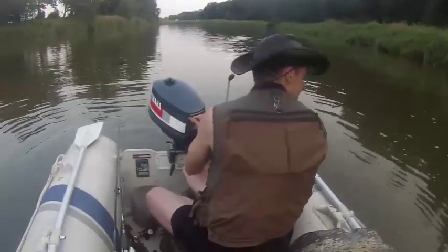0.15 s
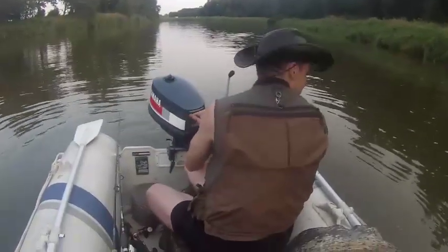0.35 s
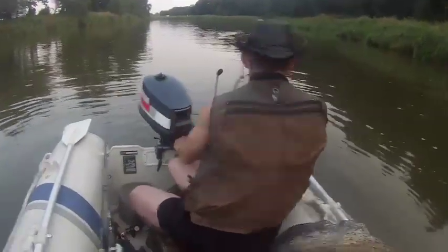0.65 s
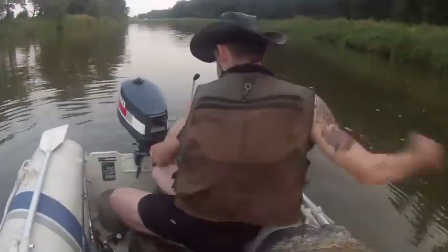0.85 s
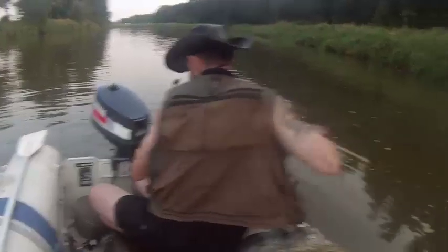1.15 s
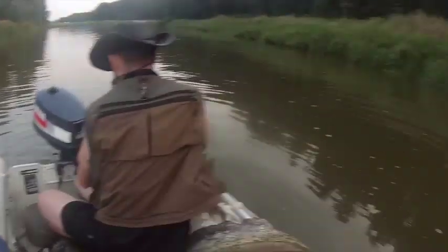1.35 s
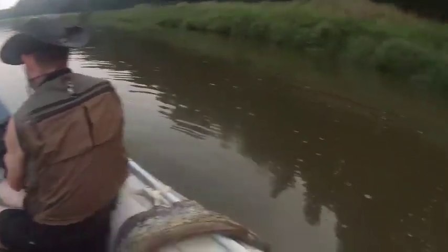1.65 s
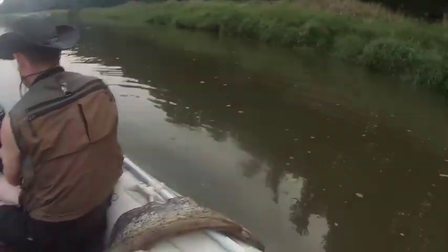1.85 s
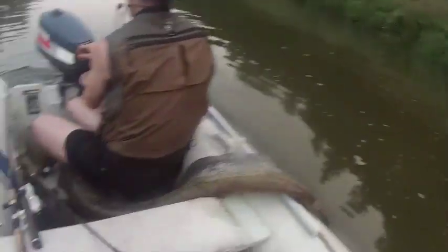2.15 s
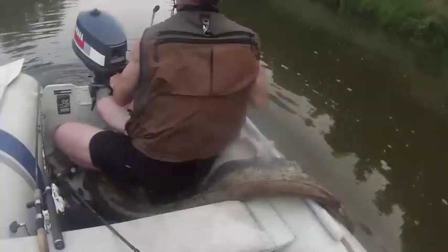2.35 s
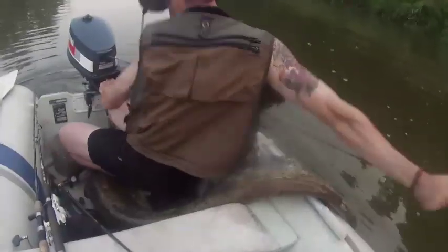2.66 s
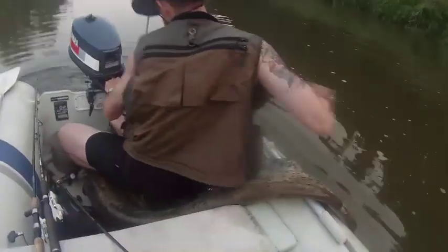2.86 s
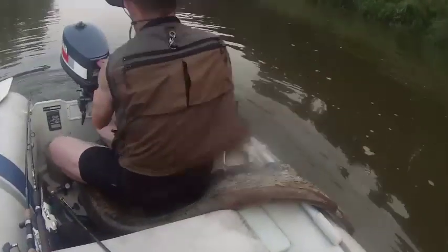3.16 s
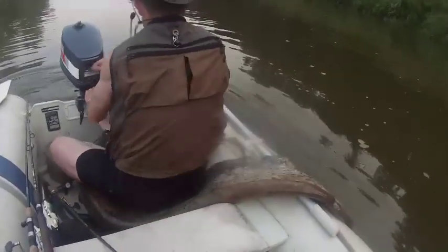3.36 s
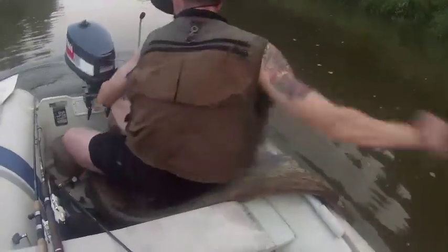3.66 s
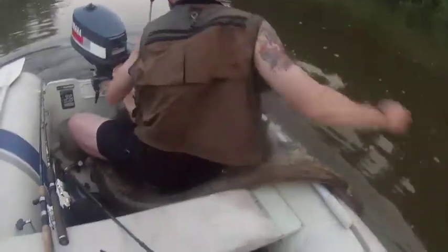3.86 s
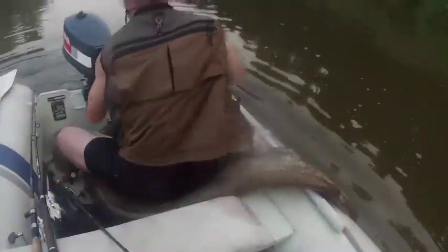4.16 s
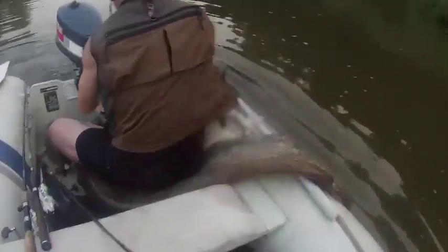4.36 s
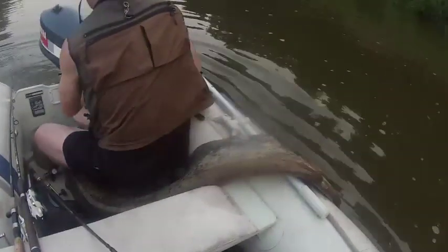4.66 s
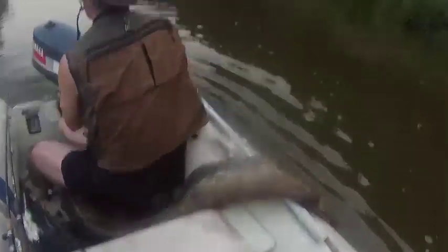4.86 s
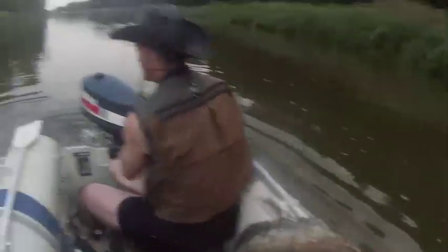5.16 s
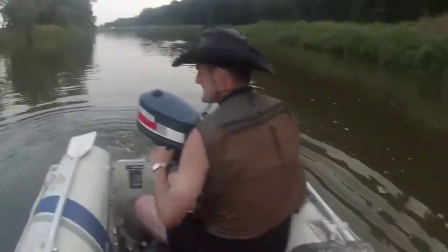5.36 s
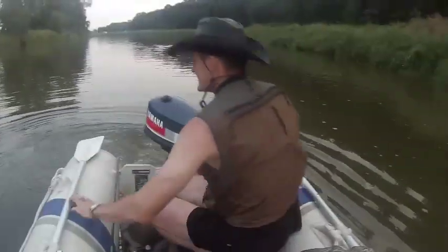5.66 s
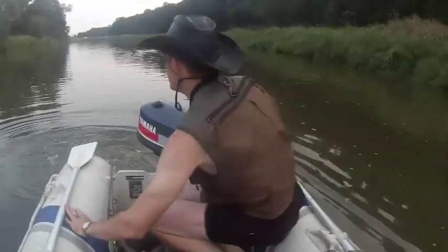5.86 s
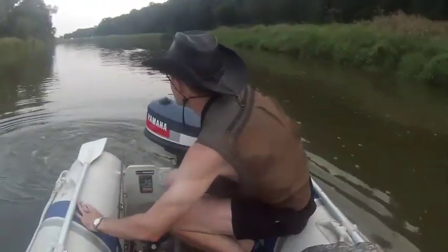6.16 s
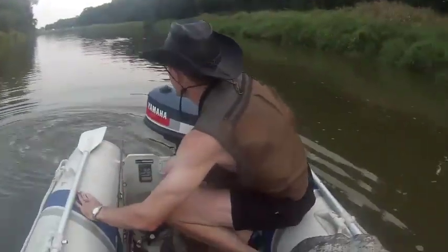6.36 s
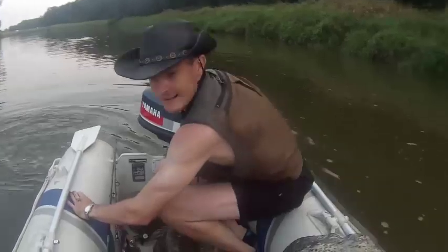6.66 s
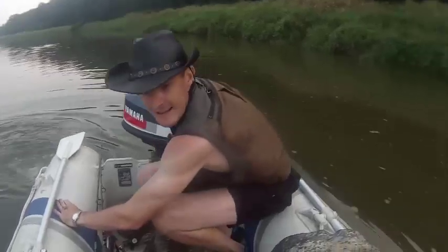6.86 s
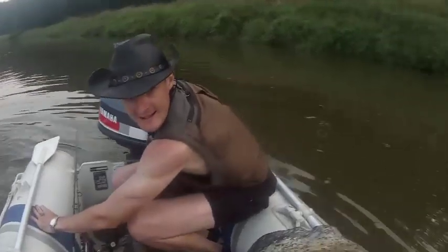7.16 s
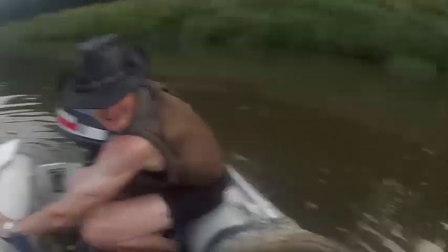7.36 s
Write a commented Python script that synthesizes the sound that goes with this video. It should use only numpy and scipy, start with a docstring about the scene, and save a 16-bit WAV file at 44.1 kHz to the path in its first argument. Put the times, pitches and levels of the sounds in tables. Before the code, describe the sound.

Heard from inside a hard plastic case, a small outboard motor is pull-started with a hollow clack and faint squeaks of cord. Handling of the case takes over for about two seconds: heavy thumps, ringing knocks and rough scrapes, much louder than anything else. Then the engine is left puttering quietly, a dulled, throbbing idle with clattering, ticking parts that quickens slightly over a light hiss.

```python
"""A hollow clack and thin cord squeaks, then loud thumps, knocks and scrapes, then a faint putter.
A small outboard on an inflatable boat is pull-started and idles, heard from inside a hard case.
Hands shift the case: its wall swings and rings, and the hardest blows make a limiter duck.
The engine fires once a turn, ringing its exhaust leg while parts clatter and tick."""
import sys
import numpy as np
from scipy import signal
from scipy.fft import rfft, irfft
from scipy.io import wavfile
from scipy.ndimage import uniform_filter1d

SR = 44100
rng = np.random.default_rng(int(sys.argv[2]) if len(sys.argv) > 2 else 0)


def pcm_store(signal):
    """Save signal as 16-bit PCM."""
    levels = np.round(np.clip(np.atleast_2d(signal), -1, 1) * 32767)
    wavfile.write(sys.argv[1], SR, levels.astype(np.int16).T)


N = 330750


def gain_of(db):
    return 10 ** (np.asarray(db) / 20)


def unit_rms(x):
    return x / np.sqrt(np.mean(x ** 2) + 1e-20)


def smooth_noise(samples):
    return unit_rms(uniform_filter1d(rng.standard_normal(N), size=samples))


def butter(x, order, hz, kind="low"):
    return signal.lfilter(*signal.butter(order, hz, kind, fs=SR), x)


def spectrum(points):
    """(Hz, value) points at every FFT bin, on a log frequency axis."""
    hz, value = np.transpose(points)
    return np.interp(np.log(np.fft.rfftfreq(N, 1 / SR) + 1), np.log(hz + 1), value)


def curves(rows):
    """Each column after time, at every sample."""
    times, *columns = np.transpose(rows)
    return [np.interp(np.arange(N) / SR, times, column) for column in columns]


def gate(rows):
    """1 over the table's time span, 0 outside, soft edges."""
    t = np.arange(N) / SR
    return uniform_filter1d(1. * (t > rows[0][0]) * (t <= rows[-1][0]), size=800, mode="nearest")


def clicks(cycles):
    """One impulse per completed cycle."""
    return np.diff(np.floor(cycles), prepend=0)


def add(mix, start_s, sound):
    part = mix[round(start_s * SR):][:len(sound)]
    part += sound[:len(part)]


def resonate(x, hz, width_hz):
    """Unit-gain resonance; hz may glide."""
    carrier = np.exp(2j * np.pi * np.cumsum(hz * np.ones(len(x))) / SR)
    pole = np.exp(-np.pi * width_hz / SR)
    return 2 * (carrier * signal.lfilter([1 - pole], [1, -pole], x / carrier)).real


def resonate_twice(x, hz, width_hz):
    return resonate(resonate(x, hz, width_hz), hz, width_hz)


def body(x, modes):
    """Drives a set of modes; white noise roughly keeps its rms."""
    energy = sum(gain_of(db) ** 2 * width for _, width, db in modes) * 2 * np.pi / SR
    ring = sum((-1) ** k * gain_of(db) * resonate(x, hz, width) for k, (hz, width, db) in enumerate(modes))
    return ring / np.sqrt(energy)


def struck(modes):
    """Click response: a clean hollow ring with distinct pitches."""
    click = signal.unit_impulse(2000)
    ring = sum(gain_of(db) * resonate_twice(click, hz, 1.3 * width) for hz, width, db in modes)
    return ring / np.linalg.norm(ring)


def thumps():
    """A pushed wall swings, rebounds and settles; quicker pushes jolt its bass modes harder."""
    # pushes: (time [s], level [dB], pitch [Hz], direction [1 in, -1 out])
    pushes = [(0.843, -37, 41.8, -1), (2.217, -8.5, 49, 1), (2.227, -13, 47.6, -1), (2.274, -13, 29.8, -1),
              (2.308, -15, 48, -1), (2.376, -11.5, 98, -1), (2.385, -9, 50, -1), (2.395, -12.5, 40, 1),
              (2.475, -19, 94, 1), (2.487, -4.5, 75, -1), (2.491, -16, 45.4, 1), (2.509, -15.5, 38.5, -1),
              (2.585, -18, 47.3, 1), (2.608, -12, 26.3, 1), (2.619, -10, 70.6, 1), (2.625, -2, 56, -1),
              (2.774, -24, 25, 1), (2.877, -19.5, 57.5, 1), (2.908, -15, 29, 1), (2.965, -7, 76, -1),
              (3.088, -22, 28.1, -1), (3.14, -23.5, 48, -1), (3.297, -22.5, 36.6, -1),
              (3.365, -20.5, 30, -1), (3.513, -20.5, 25, -1), (3.581, -22, 26.7, -1),
              (3.674, -15.5, 24.7, -1), (3.731, -20, 107, 1), (3.781, -18, 31.8, 1),
              (3.809, -18.5, 44.7, 1), (3.82, -14, 25.6, -1), (3.891, -11.5, 81, -1),
              (3.926, -13, 26.8, -1), (3.958, -12, 47, 1), (4.004, -19, 33.4, -1), (4.139, -9, 67, 1),
              (4.148, -13, 34.4, -1), (4.172, -21, 39, 1), (4.226, -21, 35.3, 1), (4.248, -16.5, 104, 1),
              (4.32, -17, 43.6, 1), (4.341, -33, 40, -1), (4.357, -18, 27, 1), (4.749, -46, 254, 1),
              (6.676, -36, 53.3, 1)]
    swell_cycles, jolt_t60_s = .23, .022
    swings, jolts = np.zeros((2, N))
    t = np.arange(SR // 4) / SR
    for s, db, hz, direction in pushes:
        age = t * hz / swell_cycles
        swell = (age * np.exp(1 - age)) ** 1.14
        add(swings, s, direction * gain_of(db) * swell * np.sin(2 * np.pi * hz * t))
        octaves = min(np.log2(hz / 68), .6)
        add(jolts, s, gain_of(db - 19 + 18.5 * octaves - 60 * t / jolt_t60_s))
    return swings, jolts


def knocks():
    """A knock is a clean click and a dying burst: burst envelopes and clicks per case band."""
    # (time [s], level [dB], bass [dB], upper ring [dB], treble [dB], top [dB], t60 [s])
    hits = [(0.79, -36, 0, -19, -8, 3, 0.045), (0.941, -39, 7, 2, -3, 10, 0.098),
            (1.022, -42, 0, -12, -7, -4.5, 0.015), (1.333, -39, -13, -16, -18, -18, 0.12),
            (1.575, -39.5, 6, 1.5, -14, -14, 0.023), (1.654, -35.5, -9, -2, -10, -5, 0.027),
            (2.216, -6, -4.5, 0, 5, 3, 0.014), (2.219, -21, -21, 4, 7, 12, 0.064),
            (2.284, -36, -7, 9, 12, 14, .03), (2.309, -35, 3, -3, -8, -8, 0.018),
            (2.344, -33, 3, 1, 5, 4, .014), (2.377, -30, 2, -9, -7, -7, 0.025),
            (2.413, -51, 2, 1, -9, -12, 0.023), (2.438, -30, 2, 3, -17, -16, 0.0069),
            (2.477, -28, 17, 0, -2, -3, 0.0082), (2.487, -11.5, -9, 7, 0.5, -20, 0.017),
            (2.624, -31, 13, 3, 7, 13, 0.026), (2.63, -35, 14, 0, 2, 9, 0.012),
            (2.763, -38, 1, 11.5, -15, -11, 0.013), (2.788, -31.5, -13, 11, -2, 1, 0.024),
            (2.826, -49, -11, 19, -7, -9, 0.014), (2.855, -60, -5, 6, -5, -8, 0.014),
            (2.883, -37, 4, -11, 4, 2, 0.021), (2.955, -20.5, -9, 6, -10, 1, 0.059),
            (2.962, -25, -6, -0.5, 5.5, -2, 0.01), (3.417, -33.5, 0, -12, 5, 6, 0.045),
            (3.727, -16, 6, 2, -5, -11, 0.027), (3.8, -35.5, 12.5, 3, -13, -13, 0.028),
            (3.81, -28.5, 9, -5, 4, -5, 0.017), (3.888, -39, 7, 3, 6, -1, 0.044),
            (4.116, -35.5, 6, 0, -13, -11, .024), (4.142, -33, -5, -6, 2, 3, 0.0089),
            (4.232, -24.5, 9, -2, -23, -25, 0.0077), (4.249, -10.5, -1, 4.5, 7.5, -25, 0.0082),
            (4.319, -11.5, -2.5, -1, 6.5, -8.5, 0.02), (4.355, -25, 17.5, -7, -15, -20, 0.024),
            (5.127, -43.5, -13, 4, -9, -9, .012)]
    band_db, snap_db = [-8.5, -12, -15, -22, -28.5, -45], 17.5
    bursts, snaps = np.zeros((2, 6, N))
    t = np.arange(SR // 8) / SR
    for s, db, bass, upper, treble, top, t60 in hits:
        for band, colour_db in enumerate((0, bass, upper, treble, top, top)):
            level_db = db + band_db[band] + colour_db
            add(bursts[band], s, gain_of(level_db - 60 * t / t60))
            add(snaps[band], s, gain_of([level_db + snap_db]))
    return bursts, snaps


def scrapes(grain):
    """A finger or strap strokes the case: grit envelopes per band."""
    # (time [s], length [s], level [dB], bass [dB], upper ring [dB], treble [dB], top [dB])
    strokes = [(0.665, 0.016, -42.5, -11, -5.5, -4.5, 3), (0.929, 0.082, -55.5, -2, -11, -5, 1),
               (2.214, 0.033, -32, 1.5, -10, 2, 0), (2.271, 0.073, -47, 2, -1, 1, 5.5),
               (2.33, 0.046, -36, 7.5, -2, -1.5, -5), (2.342, 0.023, -46, 9, -9, -1, 2),
               (2.386, 0.053, -64, 17, -19, -22, -16), (2.445, 0.013, -48, 11, -18, -18, -18),
               (2.48, 0.016, -40, 26, -5, -2, 5), (2.562, 0.058, -51.5, 15, -2, 1, -2),
               (2.611, 0.025, -41.5, 12, 3, -1, 6), (2.737, 0.26, -64.5, 5.5, 8.5, 7, 11),
               (2.974, 0.057, -60.5, 4, 6, 7, 4), (3.41, 0.024, -43.5, 2, -12, -11, -10),
               (3.634, 0.02, -53.5, -17, 8, 11.5, 1), (3.67, 0.047, -49.5, -6, -11, -12, -12),
               (3.835, 0.049, -53, 7, -7, -7, -9), (4.113, 0.075, -59, 16, 0, -9, -13),
               (4.301, 0.036, -47, 1, -2, -9, 7), (4.326, 0.09, -35, 2, -6, -7, -6),
               (4.384, .025, -41.5, -2, -15, 2, -21), (4.438, 0.014, -37, 2, -7, -2, -14)]
    band_db = [2, -3, 3, -10.5, -11, -21]
    out = np.zeros((6, N))
    for s, length, db, bass, upper, treble, top in strokes:
        n = round(length * SR)
        stroke = signal.windows.tukey(n, .4) * grain[round(s * SR):][:n]
        for band, colour_db in enumerate((0, bass, upper, treble, top, top)):
            add(out[band], s, gain_of(db + band_db[band] + colour_db) * stroke)
    return out


def rubbing():
    """Fingers and cloth rub the case: clumpy grit envelopes per band."""
    # friction: (time [s], level [dB])
    rubs = [(.55, -63), (.8, -57.5), (.95, -55), (1.2, -58.5), (1.55, -55.5), (1.85, -65), (2.2, -61.5),
            (2.27, -50), (2.39, -51.5), (2.45, -43.5), (2.59, -52), (3.26, -55.5), (3.7, -50), (4.08, -52),
            (4.31, -48.5), (4.5, -55.5)]
    band_db = [-1.5, -7, -2, -17, -15.5, -28]
    clumps = gain_of(1.6 * smooth_noise(300))
    return gate(rubs) * clumps * gain_of(curves(rubs)[0]) * gain_of(band_db)[:, None]


def squeak():
    """Skin sticks and slips on plastic, quickening as it fades: impulses per case band."""
    start_s, length_s, rise_s = 4.335, .06, .018
    band_db = [1, 4, -18, -20, -26, -53]
    t = np.arange(0, length_s, 1 / SR)
    unsteady = 1 + .18 * uniform_filter1d(rng.standard_normal(SR // 8), size=150)[:len(t)]
    slip_hz = (225 + 1700 * t) * unsteady
    slips = unit_rms(clicks(np.cumsum(slip_hz) / SR))
    slips *= np.minimum(t / rise_s, 1) ** 2 * gain_of(-26 - 14 * t / length_s)
    out = np.zeros((6, N))
    for band, db in zip(out, band_db):
        add(band, start_s, gain_of(db) * slips)
    return out


def rasps(grain):
    """Where a stroke sticks, one patch of wall sings roughly."""
    # (time [s], length [s], start [Hz], end [Hz], width [Hz], level [dB])
    patches = [(2.272, 0.057, 1450, 1360, 200, -53), (2.325, 0.048, 4900, 5570, 400, -48),
               (2.338, 0.064, 2480, 2370, 250, -46), (2.406, 0.011, 1920, 2000, 200, -49),
               (3.84, 0.056, 2320, 2380, 200, -56), (4.14, 0.045, 1950, 1830, 200, -54),
               (4.329, 0.062, 1740, 2050, 220, -34), (4.362, .03, 1040, 1340, 200, -38),
               (4.374, 0.047, 2820, 3230, 350, -49.5), (4.388, .032, 1280, 1480, 200, -41)]
    out, grit = np.zeros(N), grain * rng.standard_normal(N)
    for s, length, start_hz, end_hz, width_hz, db in patches:
        n = round(length * SR)
        ring = resonate_twice(grit[round(s * SR):][:n], np.linspace(start_hz, end_hz, n), width_hz)
        add(out, s, gain_of(db) * signal.windows.tukey(n, .6) * unit_rms(ring))
    return out


def case(jolts):
    """Contacts drive one hollow shell in six bands: middle, bass, upper ring, treble, top, edge."""
    # wall modes: (pitch [Hz], width [Hz], level [dB])
    middle = [(1130, 410, 4), (1363, 290, 9), (1530, 164, 3)]
    bass = [(181, 93, 6.5), (269, 134, 5), (428, 193, -5.5), (712, 148, -7.5)]
    upper = [(1810, 250, 0), (2080, 283, 3.5), (2314, 304, 1.5)]
    treble = [(2600, 350, 6), (3724, 440, 16), (4570, 540, 9.5)]
    top = [(5260, 910, 1.5), (5760, 600, 6), (6320, 900, 0.5)]
    grain = gain_of(4 * smooth_noise(120))
    bursts, snaps = knocks()
    envelopes = bursts + scrapes(grain) + rubbing()
    envelopes[1] += jolts
    drive = envelopes * rng.standard_normal((6, N)) + squeak()
    hollow = butter(body(drive[0], middle) + body(drive[2], upper), 2, 850, "high")
    hollow = butter(hollow + body(drive[1], bass), 2, 4500)
    bright = butter(body(drive[3], treble) + body(drive[4], top), 3, 7000)
    bright = butter(bright, 2, 2400, "high")
    edge = butter(drive[5] + snaps[5], 2, [7000, 12000], "band")
    ringing = sum(signal.oaconvolve(snap, struck(modes))[:N]
                  for snap, modes in zip(snaps, (middle, bass, upper, treble, top)))
    return hollow + bright + edge + ringing + rasps(grain)


def exhaust(turns, fast, running, strength, noise):
    """Firings ring the exhaust leg; at low speed its note throbs deeper and glides up each turn."""
    # chugs, some beats missing: (time [s], level [dB])
    chugs = [(4.52, -78), (4.54, -66.5), (4.82, -55.5), (4.86, -49.5), (4.93, -63.5), (5.11, -54.5),
             (5.14, -70), (5.17, -50), (5.3, -69), (5.37, -53), (5.42, -58.5), (5.56, -53.5), (5.6, -64),
             (5.73, -48), (5.88, -62), (5.91, -50), (6.15, -55.5), (6.17, -45), (6.23, -64), (6.26, -51),
             (6.34, -73), (6.39, -54), (6.46, -50), (6.84, -50.5), (7.0, -56.5), (7.11, -50.5), (7.14, -63),
             (7.17, -56), (7.2, -71), (7.28, -48.5), (7.35, -64), (7.46, -70), (7.5, -42)]
    # leg resonance: (time [s], pitch [Hz])
    note = [(4.52, 200), (4.9, 195), (5.14, 218), (5.45, 189), (5.72, 198), (5.95, 186.7), (6.2, 173.7),
            (6.4, 158.4), (6.46, 159.4), (6.85, 159.6), (7.0, 165.4), (7.3, 167), (7.5, 162)]
    hz = curves(note)[0] + 39 * (1 - fast) * (turns % 1 - .5)
    firings = strength[turns.astype(int)] * clicks(turns)
    puffs = resonate(resonate_twice(firings, hz, 38), hz, 70)
    rough = .61 * unit_rms(running * puffs) + .3 * unit_rms(resonate(noise, hz, 40))
    throb = 1 + (.85 - .35 * fast) * np.cos(2 * np.pi * turns - 1)
    hum = throb * np.sin(2 * np.pi * np.cumsum(hz) / SR)
    return gain_of(curves(chugs)[0]) * (.33 * rough + hum)


def clatter(turns, fast, strength, buzz_noise, shake_noise, clatter_db, cowl_db):
    """Parts rattle twice a turn, more evenly at speed; the cowl rings along."""
    # modes of the parts: (pitch [Hz], width [Hz], level [dB])
    rattle_modes = [(607, 700, -13), (1228, 91, 3), (1266, 174, 1)]
    buzz_modes = [(1980, 117, 5.5), (2303, 193, 6), (4300, 2500, -14)]
    # wandering brightest ring: (time [s], pitch [Hz])
    ring = [(4.52, 1460), (5.5, 1515), (5.85, 1410), (6.15, 1500), (6.6, 1485), (6.75, 1450), (7.0, 1450),
            (7.5, 1497)]
    cowl_hz, steady = 1400, .14 + .16 * fast
    early = turns + .44  # the main rattle leads the tick
    first = strength[early.astype(int)] * np.exp(-(early % 1) / .053)
    second = np.exp(-(turns % 1) / .088)
    snap = 4 * first * clicks(early)
    shaking = unit_rms((steady + first + 2.4 * steady * second) * shake_noise + snap)
    buzzing = unit_rms((.061 + steady + .26 * first + .48 * second) * buzz_noise + .24 * snap)
    parts = body(shaking, rattle_modes + [(curves(ring)[0], 153, 2)]) + .53 * body(buzzing, buzz_modes)
    cowl = np.sin(2 * np.pi * cowl_hz * np.arange(N) / SR) + .5 * unit_rms(resonate(shaking, cowl_hz, 41))
    return gain_of(clatter_db) * parts + gain_of(cowl_db) * cowl


def tick(turns, speed_hz, strength, noise):
    """One part taps once a turn; one of its rings dies out as the engine speeds up."""
    # (pitch [Hz], width [Hz], level [dB])
    modes = [(5720, 280, -4), (6140, 520, -8), (9800, 170, -11)]
    phase = turns % 1
    burst = phase / .04 * np.exp(-phase / .055) * noise
    tap = unit_rms(strength[turns.astype(int)] * (burst + 6 * clicks(turns)))
    fading = np.clip((27 - speed_hz) / 1.5, 0, 1)
    return body(tap, modes) + fading * gain_of(-2.5) * body(tap, [(6900, 330, 0)])


def ping():
    """A loose part rings once."""
    hz, t60_s = 6960, .035
    t = np.arange(SR // 10) / SR
    return gain_of(-55 - 60 * t / t60_s) * np.sin(2 * np.pi * hz * t)


def engine():
    """The idling crank times exhaust, clatter and tick; the case wall dulls them."""
    # (time [s], clatter [dB], tick [dB], cowl ring [dB])
    idle = [(4.52, -54.5, -81, -81), (4.85, -50, -77, -89), (5.2, -53, -70, -82), (5.5, -51.5, -68, -80),
            (5.9, -49.5, -65, -79), (6.15, -55, -68, -78), (6.6, -56, -65.5, -82), (6.73, -55.5, -66, -74),
            (6.77, -51.5, -62, -71), (6.81, -55, -60, -75), (6.85, -51.5, -74, -52), (6.89, -51, -77, -58),
            (6.95, -51.5, -63.5, -72), (7.05, -53.5, -66.5, -79), (7.5, -54.5, -64, -79)]
    # crank: (time [s], speed [turns/s])
    speed = [(4.52, 20.5), (5.2, 21.5), (5.5, 21.9), (5.95, 22.2), (6.15, 24.5), (6.3, 25.8), (6.6, 27.1),
             (7.1, 27.4), (7.25, 28.6), (7.5, 27.5)]
    slow_hz, fast_hz = 23.7, 25.6  # running smooths out over this range
    running, speed_hz = gate(idle), curves(speed)[0]
    clatter_db, tick_db, cowl_db = curves(idle)
    fast = np.clip((speed_hz - slow_hz) / (fast_hz - slow_hz), 0, 1)
    turns = np.cumsum(running * speed_hz) / SR + .06
    spread_db = [2, 1.8, 2.2]  # turn to turn
    firing_gain, rattle_gain, tap_gain = gain_of(rng.standard_normal((200, 3)) * spread_db).T
    rough_noise, shake_noise, tap_noise = rng.standard_normal((3, N))
    out = exhaust(turns, fast, running, firing_gain, rough_noise)
    out += clatter(turns, fast, rattle_gain, rough_noise, shake_noise, clatter_db, cowl_db)
    out += gain_of(tick_db) * tick(turns, speed_hz, tap_gain, tap_noise)
    out *= running
    add(out, 6.031, ping())
    return butter(out, 3, 11500)


def starter():
    """The handle clacks as it catches; the cord squeaks in its guide."""
    # handle parts: (time [s], pitch [Hz], level [dB], t60 [s])
    clack = [(0.667, 1160, -33, 0.029), (.669, 2050, -39, 0.035), (.67, 2350, -52, 0.034),
             (0.671, 193, -33, 0.05), (0.673, 1520, -31, 0.03)]
    # squeaks: (time [s], length [s], start [Hz], end [Hz], level [dB])
    cord = [(.942, .03, 5800, 6200, -62), (1.105, 0.011, 2180, 2400, -53), (1.125, 0.012, 2150, 2350, -54)]
    rise_s = .0028
    out, t = np.zeros(N), np.arange(SR // 8) / SR
    for s, hz, db, t60 in clack:
        add(out, s, np.minimum(t / rise_s, 1) * gain_of(db - 60 * t / t60) * np.sin(2 * np.pi * hz * t))
    friction = rng.standard_normal(N)
    for s, length, start_hz, end_hz, db in cord:
        n = round(length * SR)
        ring = resonate(friction[round(s * SR):][:n], np.linspace(start_hz, end_hz, n), 120)
        add(out, s, gain_of(db) * np.hanning(n) * unit_rms(ring))
    return out


def sway():
    """Slow lumpy pressure on the microphone membrane as the case moves."""
    # (time [s], level [dB])
    motion = [(0, -44.5), (.8, -46.5), (1.25, -43), (2.17, -43), (2.24, -24), (2.7, -26.5), (3.2, -29.5),
              (3.7, -30), (4.3, -25.5), (4.46, -38), (4.95, -38.5), (5.5, -44), (5.9, -43), (6.3, -40),
              (7., -45), (7.5, -40)]
    # (frequency [Hz], spectral density [dB])
    colour = [(4.7, -62), (8.0, 7.5), (21, 7.5), (39, 4.5), (83, -19.5), (104, -15), (145, -31.5),
              (300, -65), (390, -66), (660, -120)]
    rumble = irfft(rfft(rng.standard_normal(N)) * gain_of(spectrum(colour)), N)
    rumble /= np.sqrt(uniform_filter1d(rumble ** 2, size=5000))
    lumps_db = 4.5 * unit_rms(uniform_filter1d(smooth_noise(2500), size=2500))
    return gain_of(curves(motion)[0]) * unit_rms(rumble * gain_of(lumps_db))


def hiss():
    """Steady microphone circuit noise, partly different left and right."""
    # (frequency [Hz], spectral density [dB])
    colour = [(35, -68), (60, 3), (198, 0), (294, -3.5), (540, -7.5), (593, -8), (842, -11), (903, -11),
              (991, -12.5), (1090, -10), (3670, -19), (13000, -32.5), (16000, -82)]
    # (frequency [Hz], left-right correlation [0..1])
    likeness = [(60, 1.0), (180, 1.0), (550, 0.99), (1650, 1), (4970, 0.88), (15000, 0.89)]
    correlation = np.clip(spectrum(likeness), 0, 1)
    mid, side = rfft(rng.standard_normal((2, N)))
    mid *= np.sqrt((1 + correlation) / 2)
    side *= np.sqrt((1 - correlation) / 2)
    stereo = irfft(np.array([mid + side, mid - side]) * gain_of(spectrum(colour)), N)
    return gain_of(-57.5) * unit_rms(stereo)


def scene():
    """All sources centred; only the hiss is stereo."""
    swings, jolts = thumps()
    return sway() + swings + case(jolts) + engine() + hiss() + starter()


def record(dry):
    """A limiter ducks just after hard blows; then faint stereo flutter, soft clip, band limit."""
    threshold_db, max_duck_db, release_db_per_s, lag_s = -15, 23, 1400, .036
    ceiling, cutoff_hz = .8, 16200
    power = signal.lfilter(np.ones(1100) / 1100, 1, (dry ** 2).mean(0))
    late_db = 10 * np.log10(np.roll(power, 500) + 1e-12)
    demand_db = np.minimum(.7 * np.maximum(late_db - threshold_db, 0) ** 2, max_duck_db)
    release_db = np.arange(N) / SR * release_db_per_s
    held_db = np.maximum.accumulate(demand_db + release_db) - release_db
    pole = np.exp(-1 / (lag_s * SR))
    duck_db = signal.lfilter([1 - pole], [1, -pole], held_db)
    # a faint stereo flutter is added around loud peaks
    peaks = abs(uniform_filter1d(dry[0], size=80)) > .28
    after_peak = uniform_filter1d(1. * peaks, size=3001, origin=1500) > 1e-6
    flutter_db = .4 * uniform_filter1d(1. * (after_peak | (duck_db > .5)), size=200)
    flutter_db *= .8 + .22 * unit_rms(resonate(rng.standard_normal(N), 0, 400))
    ducked = dry / gain_of([duck_db - flutter_db, duck_db + flutter_db])
    clipped = ceiling * np.sign(ducked) * np.tanh((ducked / ceiling) ** 2) ** .5
    lowpass = signal.firwin(511, cutoff_hz, window=("kaiser", 9), fs=SR)
    return signal.oaconvolve(clipped, lowpass[None], "same")


dry = scene()
out = record(dry)
pcm_store(out)
```